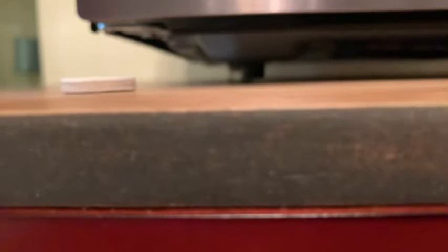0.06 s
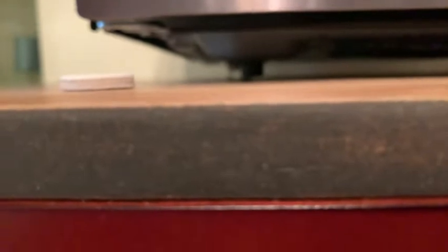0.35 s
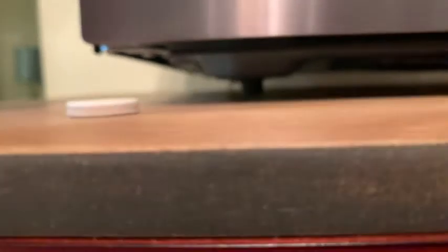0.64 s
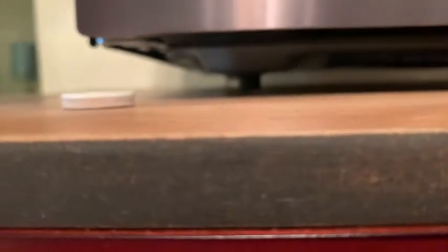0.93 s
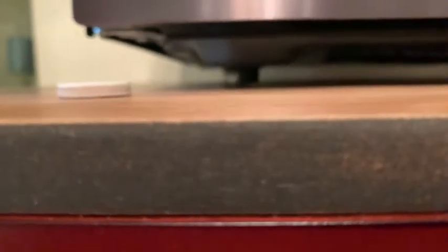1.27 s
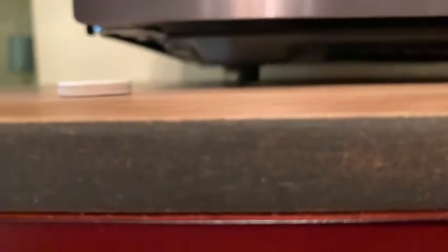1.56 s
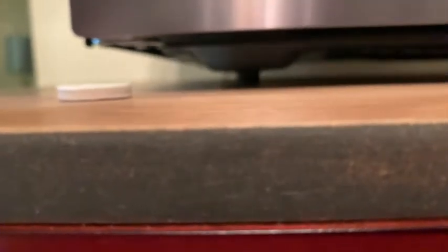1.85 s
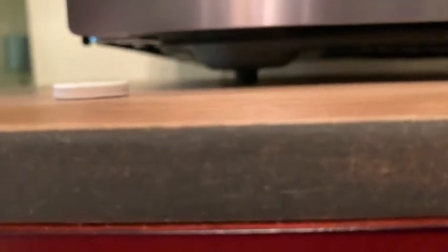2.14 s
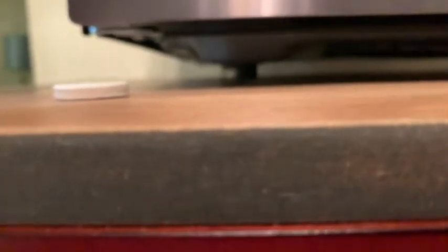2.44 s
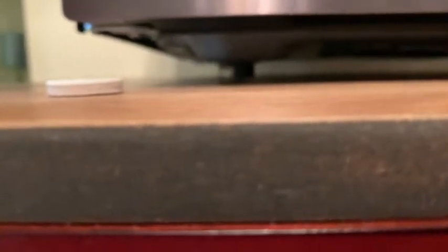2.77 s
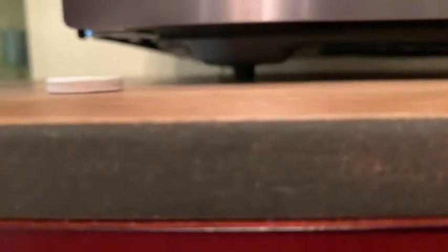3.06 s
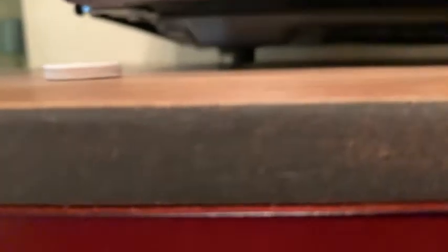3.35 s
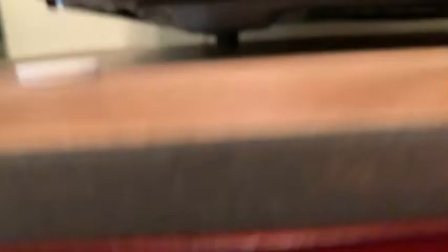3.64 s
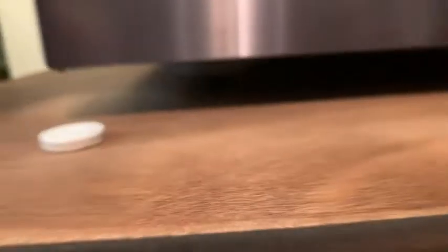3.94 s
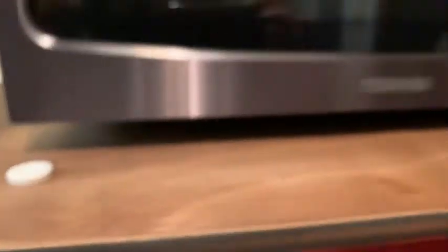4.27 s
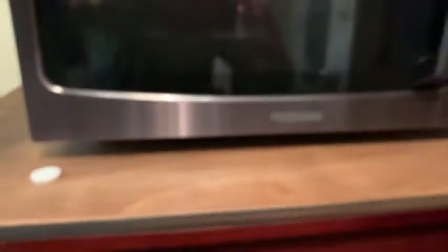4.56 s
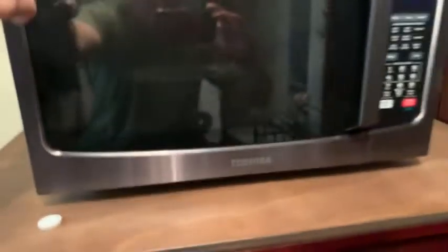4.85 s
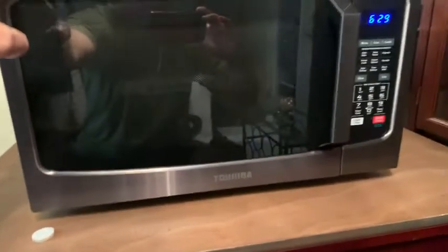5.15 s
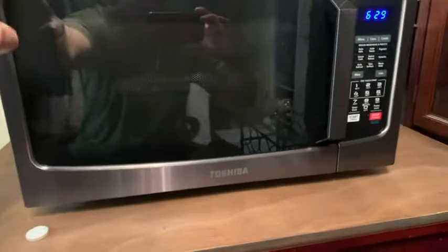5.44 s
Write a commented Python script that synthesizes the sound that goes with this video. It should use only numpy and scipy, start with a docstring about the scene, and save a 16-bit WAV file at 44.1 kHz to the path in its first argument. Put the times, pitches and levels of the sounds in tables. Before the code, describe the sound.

Close to the microphone in a small, slightly reverberant kitchen, scattered ticks come from a microwave oven's metal case. Pushed by hand, the oven tips back and forth on a wooden counter, giving four hollow, clacking knocks with a little clatter inside. Uneven rubbing and scraping of skin and cloth builds to one stronger scrape and a short squeak. The oven knocks twice more, more gently, over a faint low rumble.

```python
"""Rocking a microwave oven

A microwave oven on uneven feet is rocked by hand on a wooden kitchen counter, close to a phone.
Each landing foot clacks, the steel case booms in its modes and loose parts inside rebound.
The case ticks under the hand; hand and sleeve rub and scrape by stick-slip friction.
A small room reverberates over a low rumble."""
import sys
import numpy as np
from scipy import signal
from scipy.fft import rfft, irfft, next_fast_len
from scipy.io import wavfile

SR = 44100
rng = np.random.default_rng(int(sys.argv[2]) if len(sys.argv) > 2 else 0)


def generate_wav(sig):
    """Save sig (samples, or channels by samples) to the path in sys.argv[1] as 16-bit PCM at SR."""
    pcm = np.round(np.clip(np.atleast_2d(sig).T, -1, 1) * 32767).astype(np.int16)
    wavfile.write(sys.argv[1], SR, pcm)


N = 246959
TIME = np.arange(N) / SR
AGE = TIME[:SR]  # one second for each blow to die away

# Noise spectra. Each row: frequency in Hz, relative spectral density in dB.
RUMBLE_SPECTRUM = [(25, -33), (55, 2.5), (110, -5), (170, -1.5), (230, 2), (400, -8), (650, -13.5),
                   (850, -20.5), (1400, -21), (2200, -29.5), (3300, -38), (4900, -33), (7000, -44),
                   (15000, -46.5)]
RUB_SPECTRUM = [(150, -24), (400, -1.5), (750, -3), (1400, 1), (2500, -4), (4500, -3), (7000, -12.5),
                (10000, -17.5), (15000, -30.5)]
HISS_SPECTRUM = [(3000, -25), (6000, 4), (9000, 0), (11000, -8.5), (14000, -9), (16000, -28.5)]
TICK_SPECTRUM = [(200, -11), (800, 0.5), (1500, 4), (3000, -0.5), (5000, -0.5), (7000, -4.5), (10000, -7),
                 (14000, -15), (16000, -26)]
CUPBOARD_SPECTRUM = [(35, -27), (58, 3), (74, -5.5), (93, -1), (118, -13), (145, -22), (200, -26),
                     (500, -65)]
CLATTER_SPECTRUM = [(50, -16), (95, 1), (200, 0), (380, 2), (500, -3.5), (660, -2.5), (800, -11),
                    (1300, -18), (3000, -24), (7000, -33.5), (15000, -59)]
CLACK_SPECTRA = {"front": [(300, -2.5), (900, -2.5), (1700, -2), (2700, -5.5), (3300, -9), (4300, 2),
                 (7200, -7.5), (8500, -12), (11500, -18.5), (14000, -11), (16000, -37)], "back": [(300, 12),
                 (1500, 0.5), (3500, -6.5), (4900, 9), (6000, -2.5), (7600, 4.5), (8500, 1), (9300, -9.5),
                 (14000, -12), (16000, -29)]}  # one for each foot
# Kitchen reverberation. Each row: frequency in Hz, t60 (time to fall 60 dB) in seconds.
ROOM_DECAY = [(80, 0.98), (300, 0.56), (1000, 0.51), (4000, 0.28), (8000, 0.17), (15000, 0.12)]
# Steady rubbing. Each row: time in seconds, relative level in dB.
RUBBING_LEVELS = [(1.65, -70), (1.76, -56.5), (1.88, -49), (2.2, -56), (2.46, -58), (2.64, -70.5),
                  (2.91, -73), (3.11, -62), (3.32, -49), (4.17, -58), (4.34, -45.5), (4.59, -47.5),
                  (4.94, -55), (5.6, -50)]
# Strokes of hand and sleeve. Each row: start and swell in seconds, rub and hiss levels in dB,
# t60 in seconds.
STROKES = [(2.42, .07, -44.5, -58, 0.33), (2.865, 0.033, -54, -63.5, 0.36), (3.18, .11, -54, -51.5, 0.22),
           (3.415, 0.03, -47, -56, 0.37), (3.62, 0.078, -49, -56.5, 0.34), (3.818, .006, -38, -55, 0.19),
           (4.08, 0.1, -46, -55.5, 0.15), (4.352, 0.036, -45, -88, 0.33), (4.451, 0.096, -40.5, -51, 0.22),
           (4.671, 0.023, -41, -53, 0.089), (4.724, 0.0059, -30.5, -44.5, 0.086),
           (4.734, 0.021, -26.5, -42, 0.23), (5.08, 0.16, -41.5, -55, .25)]
# Case resonances stirred by friction. Each row: frequency and bandwidth in Hz, gain in dB.
PANEL_RESONANCES = [(377, 20, -2), (943, 26, 2.5), (1380, 35, 0.5), (1473, 45, 0), (2270, 92, 2.5),
                    (2627, 60, 3), (3310, 51, 2), (4360, 33, -11), (4740, 46, 0)]
# Squeaks, one list apiece. Each row: time in seconds, frequency in Hz, level in dB.
SQUEAK_GLIDES = [
    [(3.66, 4110, -61), (3.76, 4040, -62), (3.90, 3950, -59), (4.00, 3750, -68)],
    [(3.78, 3750, -64), (3.91, 3560, -53), (4.00, 3440, -63), (4.06, 3240, -73)],
    [(3.87, 2690, -63), (3.93, 2590, -62.5), (4.05, 2320, -75)],
    [(4.91, 1536, -72), (4.945, 1473, -45), (4.957, 1340, -49), (4.99, 1280, -60)],
]
# Clear ticks of the case. Each row: start in seconds, relative level in dB, spectral hump in Hz,
# relative treble gain in dB, t60 in seconds.
CLEAR_TICKS = [(.019, -31, 6070, 4.5, 0.12), (0.256, -43.5, 1980, -15, .06), (.329, -44, 4200, -11, 0.13),
               (.402, -37, 2930, -7, 0.14), (.493, -41, 3000, -52, 0.056), (0.733, -43.5, 4040, -36, 0.12),
               (0.907, -40.5, 2520, -43, 0.18), (.944, -38, 2160, -29, 0.079),
               (1.076, -30.5, 2660, -15, 0.068), (1.226, -47.5, 4500, -8, .27),
               (1.281, -36.5, 4770, -12, 0.051), (1.346, -40, 4140, -31, 0.075),
               (1.381, -34.5, 2680, -15, .12), (1.705, -28, 3070, -1.5, 0.11),
               (1.835, -32, 2040, -47, 0.056), (2.244, -31.5, 2940, -21, 0.039),
               (2.322, -33, 4964, 0, 0.081), (2.376, -29, 5500, 2, 0.054), (2.939, -36.5, 7000, -13, 0.18),
               (3.181, -26.5, 3400, -9.5, 0.051), (3.27, -28.5, 4500, -2.5, 0.061),
               (3.417, -35, 2000, -35, 0.036), (4.278, -33, 2720, -7, 0.094),
               (5.048, -31, 2390, -7.5, 0.046), (5.303, -31.5, 2950, -5, 0.073),
               (5.435, -25, 2100, -42, .052)]
# Bouncing of loose parts, by foot. Each row: delay and gap in seconds, loss in dB per second,
# duration in seconds.
BOUNCES = {"front": (0.081, .052, 11, .13), "back": (.038, .023, 112, .16)}
# Modes of case and counter. Each row: frequency in Hz, t60 in seconds, relative levels in dB when
# struck by the front foot, the back foot and loose parts.
CASE_MODES = [(96.3, 0.37, -28.5, -35.5, -31.5), (140.9, 0.82, -33.5, -31.5, -45),
              (160.4, 0.28, -32, -31, -34.5), (208, 0.068, -17.5, -26.5, -48), (219, 0.69, -28, -59, -40.5),
              (250.6, 0.11, -21, -31, -40), (282.6, 0.39, -26.5, -25.5, -45), (298, 0.16, -37, -24, -58),
              (363.6, 0.29, -37, -35, -38.5), (418.4, 0.45, -32, -40, -41), (458, 0.068, -17.5, -36, -50),
              (537.5, 0.19, -32, -37, -51), (599, 0.087, -23.5, -29, -58), (665.4, 0.24, -26.5, -36.5, -43),
              (741, 0.2, -34, -49, -63), (954, 0.15, -41.5, -50, -44.5)]
# Modes of foot and sheet-steel base. Each row: frequency in Hz, t60 in seconds, relative levels in dB
# when struck by the front foot and the back foot.
FOOT_MODES = [(1520, 0.04, -29, -9.5), (2100, 0.068, -19, -18), (2438, 0.13, -12, -19),
              (2893, 0.084, -12, -35), (4120, 0.036, -12, -17), (4413, .03, -8, -20),
              (5140, 0.051, -13, -16), (7020, 0.027, -1.5, -22), (7170, 0.047, -7, -4),
              (7530, 0.077, -34, -5), (8600, 0.052, -24, -4)]
# Landings. Each row: start in seconds, foot, relative clack and boom levels in dB,
# clack t60 in seconds, relative level of the first rebound in dB.
LANDINGS = [(1.9011, "front", -21, -1.5, 0.051, -7), (2.4080, "back", -31, -3, .069, 1.5),
            (2.9630, "front", -24, -3.5, 0.057, -11.5), (3.3529, "back", -28, -4.5, 0.036, -2),
            (5.1590, "front", -31.5, -9, 0.21, -18), (5.4352, "back", -42, -7, .049, -1.5)]


def undb(db):
    """Amplitude ratio of a level in decibels."""
    return 10 ** (np.asarray(db) / 20)


def unit(x):
    """Normalisation to rms 1."""
    return x / np.std(x)


def fade(t60):
    """Exponential decay, 60 dB down after t60 seconds."""
    return np.exp(-np.log(1000) * AGE / t60)


def onset(rise_s):
    """Exponential approach to full amplitude."""
    return 1 - np.exp(-AGE / rise_s)


def add(out, start_s, sound):
    """Superposition: a sound adds to the mix from start_s on."""
    i = int(np.clip(start_s * SR, 0, N))
    out[i:i + len(sound)] += sound[:N - i]


def colour(x, spectrum):
    """Spectral shaping by (Hz, dB) points, at rms 1."""
    hz, db = np.transpose(spectrum)
    size = next_fast_len(len(x))
    bins_hz = np.maximum(np.fft.rfftfreq(size, 1 / SR), 1)
    gain = undb(np.interp(np.log(bins_hz), np.log(hz), db))
    return unit(irfft(rfft(x, size) * gain, size)[:len(x)])


def band(x, hz, kind):
    """Second-order low-pass or high-pass filtering."""
    return signal.sosfilt(signal.butter(2, hz, kind, fs=SR, output="sos"), x)


def grit(size, spread_db):
    """Stick-slip noise: dense tiny slips of uneven strength."""
    noise = rng.standard_normal(size)
    slip_db = spread_db * np.repeat(rng.standard_normal(size // 32 + 1), 32)[:size]
    return unit(noise * undb(slip_db))


def rumble(level_db=-52.5):
    """Stationary background noise, strongest in the bass."""
    return undb(level_db) * colour(rng.standard_normal(N), RUMBLE_SPECTRUM)


def kitchen(x, first_s=0.0036, build_s=0.0023):
    """Reverberation: diffuse reflections from walls and cupboards, the treble dying first."""
    hz, t60s = np.transpose(ROOM_DECAY)
    noise = rfft(rng.standard_normal(SR))
    bins_hz = np.maximum(np.fft.rfftfreq(SR, 1 / SR), 1)
    tail = np.zeros(SR)
    for pick, t60 in zip(np.eye(len(hz)), t60s):
        passband = np.interp(np.log(bins_hz), np.log(hz), pick)
        tail += irfft(noise * passband, SR) * fade(t60)
    tail *= np.clip((AGE - first_s) / build_s, 0, 1)
    return signal.fftconvolve(x, tail / np.sqrt(np.sum(tail ** 2)))[:N]


def rubbing_envelope(gain_db=-1.5):
    """Friction needs motion: the steady rubbing is silent until the hand starts to slide."""
    times, db = np.transpose(RUBBING_LEVELS)
    return undb(np.interp(TIME, times, db) + gain_db) * (TIME > times[0])


def stroke_envelopes(swell_power=0.67):
    """Rub and hiss follow the force of each stroke: a power-law swell, then exponential decay."""
    rub, hiss = np.zeros(N), np.zeros(N)
    for start, swell, rub_db, hiss_db, t60 in STROKES:
        decay = undb(-60 * np.maximum(AGE - swell, 0) / t60)
        force = np.minimum(AGE / swell, 1) ** swell_power * decay
        add(rub, start, undb(rub_db) * force)
        add(hiss, start, undb(hiss_db) * force)
    return rub, hiss


def scrapes():
    """Forced vibration: the stick-slip grains of each stroke stir the resonances of the case."""
    force, _ = stroke_envelopes()
    grains = colour(grit(N, spread_db=0.5), RUB_SPECTRUM)
    panels = sum(undb(db) * signal.lfilter(*signal.iirpeak(hz, hz / width, SR), grains)
                 for hz, width, db in PANEL_RESONANCES)
    return force * unit(grains + panels)


def sliding(body_db=-1, steady_hiss_db=-22.5, stroke_hiss_db=-0.5, flutter_db=3):
    """Sliding friction: skin and cloth rub unevenly, with a fine hiss when they move fast."""
    steady = rubbing_envelope()
    _, fast = stroke_envelopes()
    grip = undb(flutter_db * unit(band(rng.standard_normal(N), 29, "low")))
    body = unit(band(colour(grit(N, spread_db=2), RUB_SPECTRUM), 4500, "low"))
    hiss = colour(grit(N, spread_db=3.5), HISS_SPECTRUM)
    hiss_gain = steady * undb(steady_hiss_db) + fast * undb(stroke_hiss_db)
    return grip * (body * steady * undb(body_db) + hiss * hiss_gain)


def catches(count=330, weakest_db=2, range_db=8, low_hz=750, high_hz=2000, t60=0.052):
    """Damped oscillation: sliding skin catches again and again, each catch ringing at its own pitch."""
    out = np.zeros(N)
    force, begin = rubbing_envelope(), RUBBING_LEVELS[0][0]
    envelope = fade(t60) * onset(0.0019)
    for when, pitch, size in rng.random((count, 3)):
        start = begin + when * (TIME[-1] - begin)
        hz = low_hz * (high_hz / low_hz) ** pitch
        gain = force[int(start * SR)] * undb(weakest_db + range_db * size)
        ping = envelope * np.sin(2 * np.pi * hz * AGE)
        add(out, start, gain * ping[:SR // 10])
    return out


def crackle(count=60, weakest_db=-3, range_db=8, t60=0.045):
    """Sudden release: the sliding hand snags and lets go with a dry little crack."""
    snags, begin = np.zeros(N), RUBBING_LEVELS[0][0]
    for when, size in rng.random((count, 2)):
        start = begin + when * (TIME[-1] - begin)
        add(snags, start, undb(weakest_db + range_db * size) * fade(t60))
    grains = colour(band(grit(N, spread_db=2), 6000, "low"), RUB_SPECTRUM)
    return rubbing_envelope() * snags * grains


def squeaks(waver_hz=100):
    """Friction-induced vibration: a narrow, rough band whose pitch falls as the sliding slows."""
    out = np.zeros(N)
    for glide in SQUEAK_GLIDES:
        times, hz, db = np.transpose(glide)
        waver = unit(band(rng.standard_normal(N), waver_hz, "low"))
        tone = np.sqrt(2) * np.sin(2 * np.pi * np.cumsum(np.interp(TIME, times, hz)) / SR)
        out += waver * tone * np.interp(TIME, times, undb(db), left=0, right=0)
    return out


def faint_ticks(per_second=2.5, db=-52, hz=2800, treble_db=-34, t60=0.06, spread_db=3, octaves=0.45):
    """Small slips, one at a random moment of each interval, as rows like those of CLEAR_TICKS."""
    rows = []
    for k in range(int(per_second * N / SR)):
        size, pitch = rng.standard_normal(2)
        start = (k + rng.random()) / per_second
        rows.append((start, db + spread_db * size, hz * 2 ** (octaves * pitch), treble_db, t60))
    return rows


def ticks(gain_db=-7, lift_db=9, hump_db=5, hump_octaves=0.48, spot_db=2, rise_s=0.0017):
    """Stick-slip under load: panels and feet crunch, with a hump at the pitch of the slipping part."""
    out = np.zeros(N)
    hz = np.geomspace(200, 16000, num=110)
    base_hz, base_db = np.transpose(TICK_SPECTRUM)
    base = np.interp(np.log(hz), np.log(base_hz), base_db)
    for start, db, hump_hz, treble_db, t60 in CLEAR_TICKS + faint_ticks():
        hump = hump_db * np.exp(-(np.log2(hz / hump_hz) / hump_octaves) ** 2)
        treble = np.interp(hz, [5500, 12000], [0, treble_db + lift_db])
        spot = spot_db * rng.standard_normal(len(hz))  # each spot on the case has its own peaks and dips
        slip = colour(grit(SR, spread_db=2.5), np.c_[hz, base + hump + treble + spot])
        add(out, start, undb(db + gain_db) * slip * fade(t60) * onset(rise_s))
    return out


def cupboard(gain_db=-33, t60=0.88, rise_s=0.027):
    """Structure-borne sound: the hollow counter takes up each landing and grumbles on unevenly."""
    force = np.zeros(N)
    for start, _, _, boom_db, *_ in LANDINGS:
        add(force, start, undb(boom_db + gain_db) * fade(t60) * onset(rise_s))
    return force * colour(rng.standard_normal(N), CUPBOARD_SPECTRUM)


def ring(modes, blow, detune, scatter_db=0, sway=0, sway_hz=6):
    """Modal superposition: a blow excites damped modes, neighbours swinging in opposite senses."""
    column = ("front", "back", "loose").index(blow)
    chance = rng.standard_normal((len(modes), 2))
    # the shifting load stiffens and slackens the case, so all its pitches sway together
    clock = np.cumsum(1 + sway * np.sin(2 * np.pi * (sway_hz * AGE + rng.random()))) / SR
    out = np.zeros(SR)
    for k, ((hz, t60, *levels_db), (drift, size)) in enumerate(zip(modes, chance)):
        n = int(t60 * SR)
        gain = (-1) ** k * undb(levels_db[column] + scatter_db * size)
        swing = np.sin(2 * np.pi * hz * (1 + detune * drift) * clock[:n])
        out[:n] += gain * fade(t60)[:n] * swing
    return out


def rebounds(clatter_db=-26, t60=0.098, case_db=-1, rise_s=0.00081, jitter_s=0.003, uneven_db=2.5):
    """Inelastic collisions: loose parts bounce ever more weakly, clattering and shaking the case."""
    out = np.zeros(N)
    for start, foot, *_, first_db in LANDINGS:
        delay, gap, loss, duration = BOUNCES[foot]
        for elapsed in np.arange(0, duration, gap):
            late, size = rng.standard_normal(2)
            clatter = undb(clatter_db) * colour(rng.standard_normal(SR), CLATTER_SPECTRUM) * fade(t60)
            shake = undb(case_db) * ring(CASE_MODES, "loose", detune=0.0136, scatter_db=3, sway=0.025)
            gain = undb(first_db - loss * elapsed + uneven_db * size)
            add(out, start + delay + elapsed + jitter_s * late, gain * (clatter + shake) * onset(rise_s))
    return out


def thumps(hz=90, swell_s=0.015, front_db=-36, back_db=-24):
    """Mass on a spring: the whole oven bounces on its feet for a few deep cycles."""
    out = np.zeros(N)
    swing = AGE / swell_s * np.exp(1 - AGE / swell_s) * np.sin(2 * np.pi * hz * AGE)
    for start, foot, _, boom_db, *_ in LANDINGS:
        foot_db = front_db if foot == "front" else back_db
        add(out, start, undb(boom_db + foot_db) * swing)
    return out


def booms(lag_s=0.0018, front_rise_s=0.0028, back_rise_s=0.0027):
    """Free vibration: the weight comes down on a foot and sets the case swinging in its modes."""
    out = np.zeros(N)
    for start, foot, _, boom_db, *_ in LANDINGS:
        rise_s = front_rise_s if foot == "front" else back_rise_s
        case = ring(CASE_MODES, foot, detune=0.012, sway=0.032)
        add(out, start + lag_s, undb(boom_db) * case * onset(rise_s))
    return out


def clacks(gain_db=-0.5, seat_s=0.0048, seat_db=-3, ring_db=-2):
    """Impact: a hard foot meets the wood and rings the base, then seats itself a moment later."""
    out = np.zeros(N)
    for start, foot, clack_db, _, t60, _ in LANDINGS:
        for lag, drop_db in ((0, 0), (seat_s, seat_db)):
            crack = colour(rng.standard_normal(SR), CLACK_SPECTRA[foot]) * fade(t60)
            steel = undb(ring_db) * ring(FOOT_MODES, foot, detune=0.0128)
            add(out, start + lag, undb(clack_db + drop_db + gain_db) * (crack + steel))
    return out


def scene():
    """Direct and reverberant fields add over the rumble; each source has its own share of room."""
    clack = clacks()
    boom = thumps() + booms() + rebounds() + cupboard()
    tick = ticks()
    friction = scrapes() + sliding() + catches() + crackle() + squeaks()
    # the deepest bass is thinned before the reverberation, keeping the low thump a little drier
    thinned_boom = band(boom, 87, "high")
    room = kitchen(undb(-9.5) * (clack + thinned_boom) + undb(-2.5) * tick + undb(-14) * friction)
    return (clack + boom + tick + friction + room + rumble())[None]


def record(dry, bass_hz=32.5, top_hz=16200):
    """Band limiting: the phone thins the deepest bass and cuts the top."""
    steep_lowpass = signal.ellip(8, 0.2, 70, top_hz, fs=SR, output="sos")
    return signal.sosfilt(steep_lowpass, band(dry, bass_hz, "high"))


dry = scene()
out = record(dry)
generate_wav(out)
```